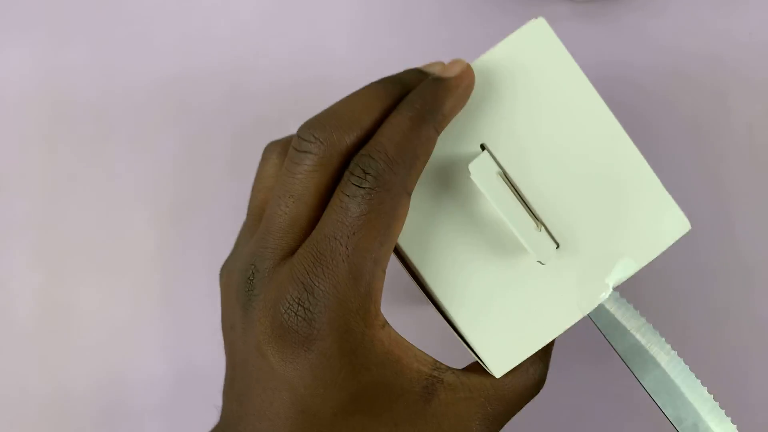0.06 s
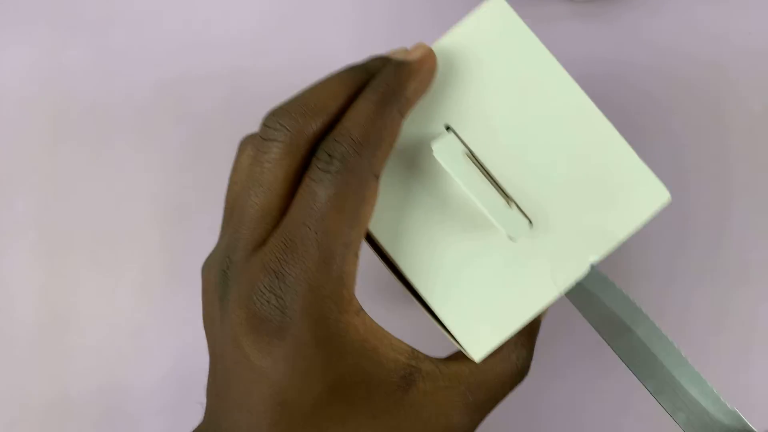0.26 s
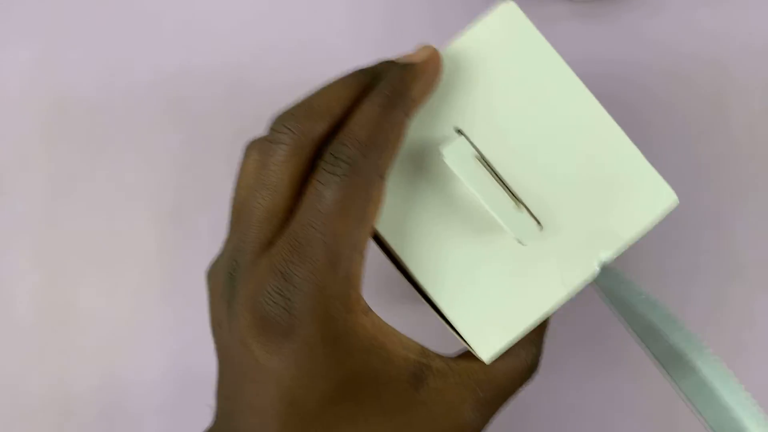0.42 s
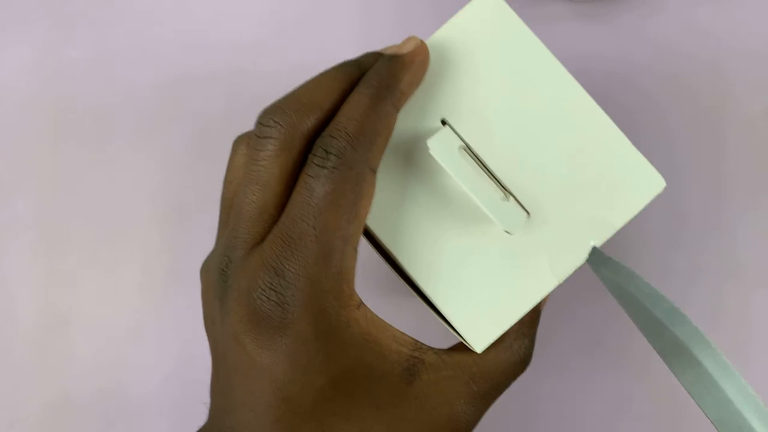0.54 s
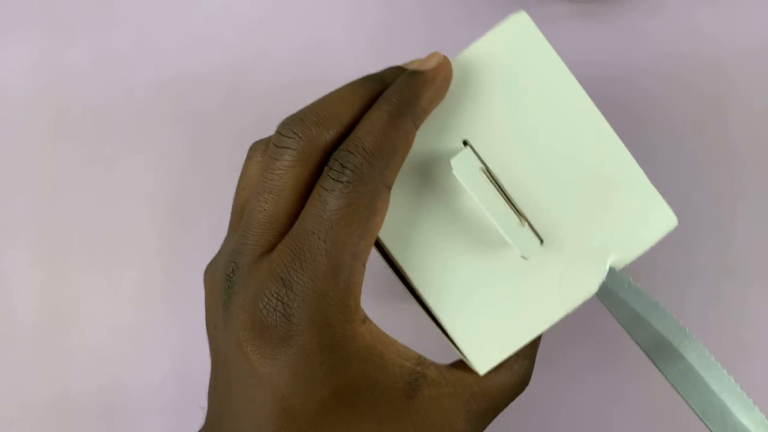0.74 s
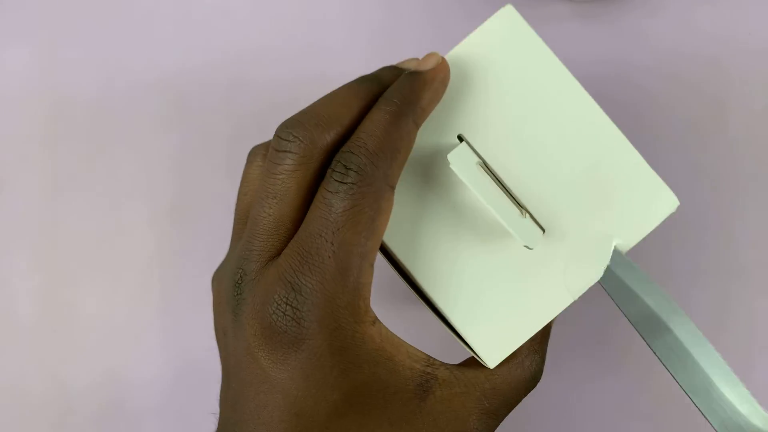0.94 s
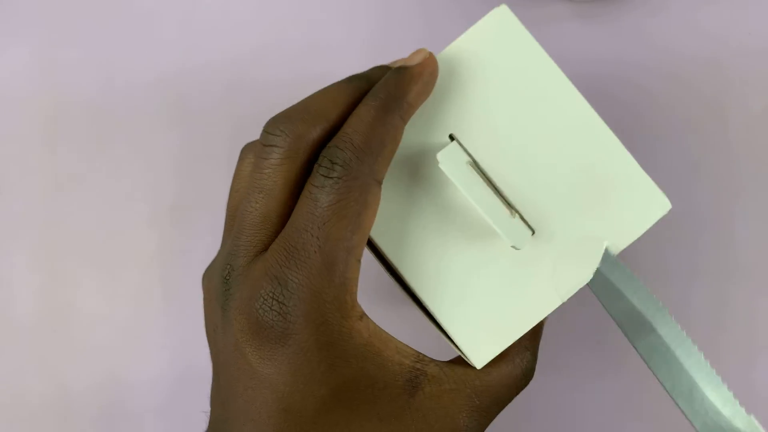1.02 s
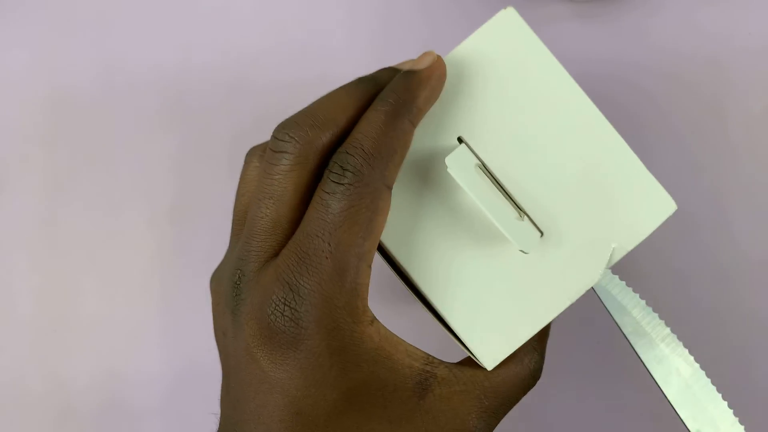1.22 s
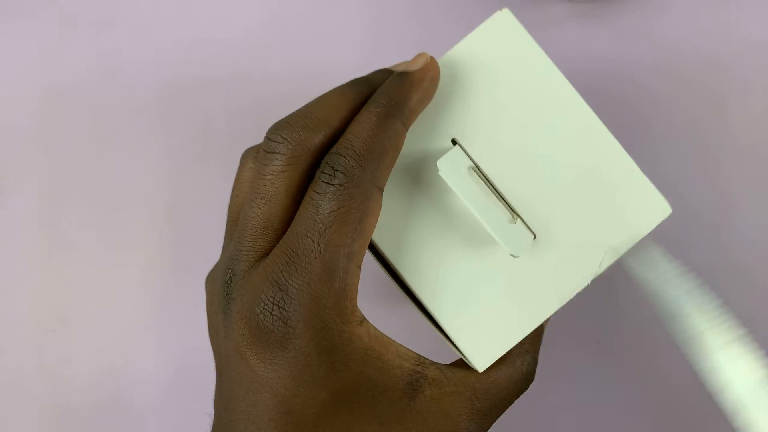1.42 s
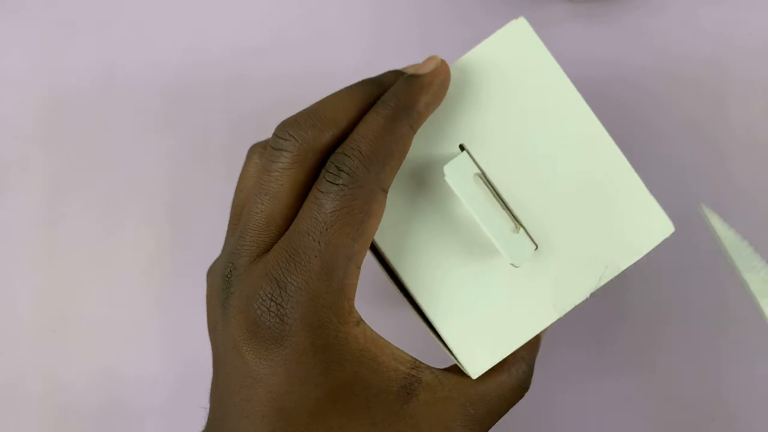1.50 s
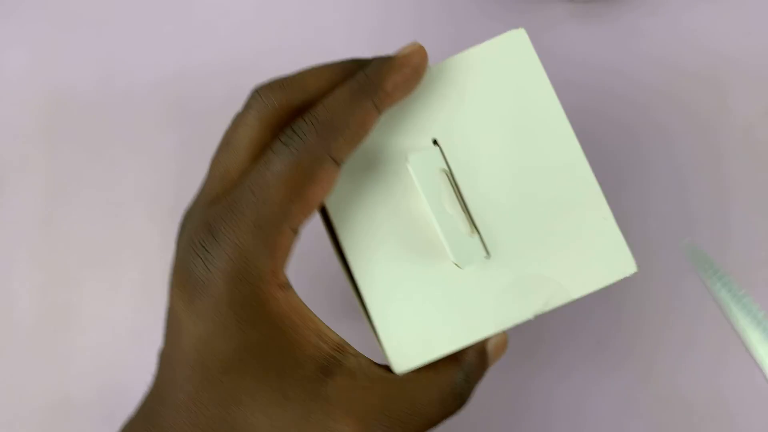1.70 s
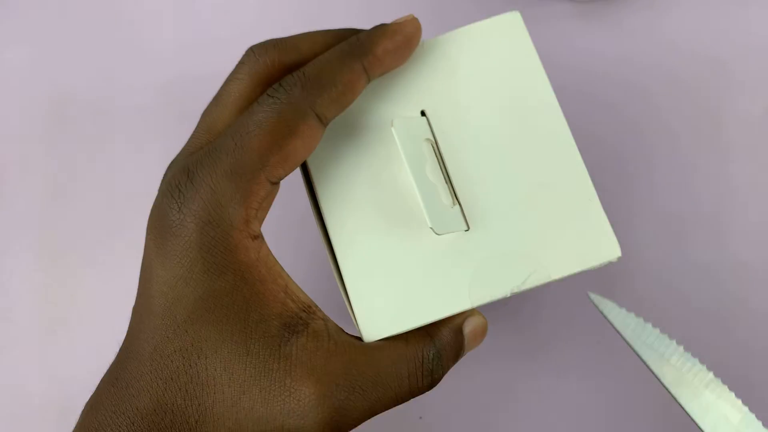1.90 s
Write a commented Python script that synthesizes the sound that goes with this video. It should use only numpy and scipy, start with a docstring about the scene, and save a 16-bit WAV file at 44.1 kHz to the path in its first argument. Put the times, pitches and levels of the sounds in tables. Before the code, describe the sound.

A serrated knife saws at a sticker on a small hollow cardboard box in short uneven scrapes, with papery crackles and boxy thumps, fading into quiet room tone; close microphone in a small room.

```python
"""A serrated knife saws at a sticker on a small hollow cardboard box, held on a table close to a phone.
Its teeth scratch paper fibres: dense random clicks, coloured by paper and blade. Fibres snap in bright noise
bursts, and the blade squeaks in narrow bands of noise. Caught teeth jolt the box, which rings as a set of fading
tones. The shuddering table is two low wavering tones that rise and fall. A room echo follows the knife and box;
behind lie soft room noise, a low hum of narrow noise and faint far whistles of plain tone."""
import sys
import numpy as np
from scipy import signal
from scipy.fft import rfft, irfft
from scipy.io import wavfile
from scipy.ndimage import uniform_filter1d

SR = 44100
rng = np.random.default_rng(int(sys.argv[2]) if len(sys.argv) > 2 else 0)


def magnitude_from_level(level_db):
    """Linear magnitude for a level in decibels (20 dB per decade)."""
    exponent = np.asarray(level_db, float) / 20
    return 10 ** exponent


def store_pcm(level_fs):
    """Save levels as 16-bit WAV."""
    pcm = np.round(np.clip(level_fs, -1, 1) * 32767).astype(np.int16)
    wavfile.write(sys.argv[1], SR, np.atleast_2d(pcm).T)


N = 85995  # length in samples


def unit(x):
    """Scale to an rms (average strength) of 1."""
    return x / np.sqrt(np.mean(x ** 2))


def colour(x, points):
    """Shape the spectrum through (f/Hz, level/dB) points, with a filter that never sounds ahead of its input."""
    points = np.array(points, float)
    hz = np.linspace(1, SR / 2, 2049)
    level_db = np.interp(np.log(hz), np.log(points[:, 0]), points[:, 1])
    # Folding the cepstrum (the spectrum of the log spectrum) makes the filter minimum-phase.
    cepstrum = irfft(level_db * np.log(10) / 20)
    cepstrum[1:2048] *= 2
    cepstrum[2049:] = 0
    response = irfft(np.exp(rfft(cepstrum)))[:2048]
    return signal.fftconvolve(x, response)[:N]


def ring(x, modes):
    """Strike a bank of fading tones (modes) with x; neighbours swing in opposite phase."""
    out = 0
    for k, (hz, db, t60) in enumerate(modes):
        pole = np.exp(2j * np.pi * hz / SR - np.log(1000) / (t60 * SR))
        out = out + (-1) ** k * magnitude_from_level(db) * signal.lfilter([1], [1, -pole], x).imag
    return out


def band(x, hz, width):
    """Keep mostly the sound around one pitch, with a resonant filter."""
    return signal.lfilter(*signal.iirpeak(min(hz, .45 * SR), hz / width, SR), x)


def clicks(rate, spread_db):
    """Random clicks of either sign, rate per second; a random boost makes a few much larger."""
    u, e = rng.random((2, N))
    chance = rate / SR
    sign = np.sign(u - .5 * chance)
    return (u < chance) * sign * magnitude_from_level(-spread_db * np.log(1 - e))


# Tone of the room noise: f/Hz, relative level/dB
ROOM_TONE = [(20, -25), (40, -5.5), (140, -3.5), (333, -11.5), (582, -18.5), (800, -24.5), (1800, -27.5),
             (6000, -36), (15600, -34)]
# Appliance hum: f/Hz, level/dB, width/Hz
HUM_BANDS = [(118.4, -64.5, 12)]
# Far whistle: t/s, length/s, f/Hz, level/dB
WHISTLES = [(1.2, 0.15, 1383, -79), (1.72, 0.065, 1525, -76.5), (1.832, 0.083, 1520, -75)]
ROOM_DB = -63.5


def room():
    """Still air as coloured noise, a wavering hum as narrow noise, and a far whistle as plain tones."""
    t = np.arange(N) / SR
    out = magnitude_from_level(ROOM_DB) * unit(colour(rng.standard_normal(N), ROOM_TONE))
    for hz, db, width in HUM_BANDS:
        out = out + magnitude_from_level(db) * unit(band(rng.standard_normal(N), hz, width))
    for s, length, hz, db in WHISTLES:
        fade = np.clip(np.minimum(t - s, s + length - t) / 0.0072, 0, 1)  # 7.2 ms in and out
        out = out + magnitude_from_level(db) * fade * np.sin(2 * np.pi * hz * t)
    return out


# Rising and falling table shudder: t/s, low mode level/dB, upper mode level/dB
TABLE_LEVELS = [(0.0, -53, -58), (0.092, -64, -59), (0.178, -58, -77), (0.216, -50, -83),
                (0.248, -49.5, -68), (0.286, -75, -53), (0.33, -57.5, -78), (0.456, -53, -48),
                (0.536, -52, -57), (0.574, -67, -52.5), (0.684, -42, -60.5), (0.748, -60, -56.5),
                (0.83, -50, -56), (0.884, -76, -67), (0.938, -52, -73), (0.972, -65, -73), (1.02, -44, -52),
                (1.064, -53, -53.5), (1.124, -60, -56), (1.204, -53, -83), (1.356, -66, -63.5),
                (1.476, -57, -74), (1.52, -67, -84), (1.558, -56.5, -78), (1.618, -62, -76),
                (1.672, -58.5, -74), (1.748, -65, -87), (1.786, -68.5, -72), (1.884, -62.5, -75),
                (1.95, -65, -65)]
# Pitches of the low and upper table modes: f/Hz
TABLE_HZ = (51.44, 89.4)
TABLE_WAVER_HZ = 3.6  # rms drift in pitch


def table():
    """The table sways in two low modes, each a sine that drifts slightly in pitch."""
    rows, t, out = np.array(TABLE_LEVELS), np.arange(N) / SR, 0
    for k, hz in enumerate(TABLE_HZ):
        waver = unit(uniform_filter1d(uniform_filter1d(rng.standard_normal(N), 3000), 3000))
        phase = 2 * np.pi * np.cumsum(hz + TABLE_WAVER_HZ * waver) / SR
        level = magnitude_from_level(np.interp(t, rows[:, 0], rows[:, k + 1]))
        out = out + level * np.sqrt(2) * np.sin(phase)  # root 2: a sine's peak over its rms
    return out


ECHO_DB, ECHO_HZ = -12, 1410  # echo level; where its duller part starts to lose treble
ECHO_BUILD_S, ECHO_T60_S, BRIGHT_T60_S = .018, 0.28, 0.26  # rise, then time to fall 60 dB


def wall_echo(near):
    """Walls return the sound as a noise-like tail that builds up, fades and grows duller."""
    t = np.arange(SR // 2) / SR
    bright = rng.standard_normal(len(t))
    dull = signal.lfilter(*signal.butter(1, ECHO_HZ, fs=SR), bright)
    fading = dull * magnitude_from_level(-60 * t / ECHO_T60_S) + .5 * bright * magnitude_from_level(-60 * t / BRIGHT_T60_S)
    tail = np.clip(t / ECHO_BUILD_S, 0, 1) * fading
    return magnitude_from_level(ECHO_DB) * signal.fftconvolve(near, tail / np.sqrt(np.sum(tail ** 2)))[:N]


# Blade strokes: t/s, scratch level/dB, box rumble level/dB (relative to scratch, before RUMBLE_DB),
# top treble level/dB (relative to scratch)
STROKE_LEVELS = [
    [(0.0, -62.5, 7, 1), (0.02, -58, 17, -6.5), (0.038, -65, -10, -3.5), (0.112, -65, 12, -1),
     (0.13, -70, -11, -3), (0.142, -70.5, 4, -4), (0.17, -77, -1, -14)],
    [(0.17, -75, 28, -7), (0.188, -66, 18, -3), (0.208, -51, 15.5, -5), (0.22, -70.5, 24.5, -2),
     (0.294, -73.5, -12, -3), (0.32, -70.5, -15, -15), (0.334, -70.5, 23, -13), (0.38, -60, 17, -3),
     (0.41, -72, -16, -5)],
    [(0.41, -78, 7, -10), (0.432, -43.5, 25, -3.5), (0.458, -46, 11.5, -7), (0.464, -40, 20, -3.5),
     (0.508, -50.5, 14.5, -8), (0.532, -59.5, 1, 0), (0.568, -64.5, 24, -3), (0.58, -72, -3, 4)],
    [(0.58, -62.5, -4, -6), (0.624, -49.5, 8.5, -9), (0.648, -46.5, 7, -6), (0.68, -50.5, 11, -28),
     (0.688, -57.5, 0, 8.5), (0.704, -52, 22.5, -23), (0.726, -60, -13, -7), (0.786, -59.5, -9, -5),
     (0.88, -76, -7, -6)],
    [(0.88, -72, -4, -11), (0.89, -75, 20, -10), (0.912, -70, -4, -9), (0.952, -63.5, 23, -5),
     (0.968, -60, -10, -5), (0.982, -62, -8, -3), (0.994, -46, 11.5, -2), (1.062, -68, 8, 1),
     (1.075, -69, -6, -5)],
    [(1.075, -57.5, -5, -10), (1.087, -64, 7, -10), (1.097, -61, 22, 3), (1.127, -58.5, -4, -1.5),
     (1.131, -58.5, 15, 1.5), (1.193, -62, 16.5, -1.5), (1.253, -81, -16, -11), (1.297, -71.5, 2, -7),
     (1.36, -86, 21, 6)],
    [(1.36, -84, 26, -8), (1.402, -58.5, 7, -5), (1.464, -60, 15.5, 0), (1.49, -48, 3, -4),
     (1.598, -78.5, 9, -1), (1.664, -66.5, -18, -2), (1.702, -93, 33, 17), (1.732, -75, -7, -26),
     (1.95, -90, 8, 0)],
]


def stroke(col):
    """Glide along one column of the strokes, giving a value for every sample."""
    rows = np.vstack(STROKE_LEVELS)
    return np.interp(np.arange(N) / SR, rows[:, 0], rows[:, col])


# A tooth catches and jolts the box: t/s, push level/dB, f/Hz, length/cycles
BOX_JOLTS = [(.0095, -44.5, 257, 2.9), (0.0152, -42, 262, 1.9), (0.206, -33.5, 267, 2.04),
             (0.218, -45, 220, 2.3), (0.4308, -23.5, 452.6, 3.9), (0.437, -36, 260, 2.9),
             (0.454, -34.5, 300, 2.26), (0.459, -32, 396, 7.9), (0.472, -30, 474, 4.05),
             (.477, -38, 440, 1.5), (0.489, -22, 448, 2.9), (.499, -26.5, 424, 2.8), (.505, -31, 300, 3),
             (0.511, -32, 403, 3.2), (0.641, -23.5, 342, 2.69), (0.651, -27, 368, 5.3),
             (0.659, -30.5, 350, 2.3), (0.67, -32, 358, 2), (0.678, -34, 398, 3.6),
             (0.686, -27.5, 332, 1.48), (0.696, -49, 410, 4.3), (0.706, -41, 332, 3),
             (.766, -45.5, 323, 4.2), (0.9949, -27, 300, 2.5), (1.007, -41, 300, 2.1),
             (1.015, -41.5, 277, 3.66), (1.404, -45.5, 255, 3.3), (1.475, -40, 350, 2.64),
             (1.481, -37, 396, 2.5), (1.518, -36, 350, 3), (1.526, -41, 482, 3.4)]
# Ringing tones of the hollow box: f/Hz, relative level/dB, time to fall 60 dB/s
BOX_MODES = [(171, -19.5, 0.1), (200.5, -9.5, 0.027), (249.6, 8.5, 0.025), (300, -26.5, 0.02),
             (350, 9, 0.041), (413, 3.5, 0.044), (498.8, 3, 0.061), (583, -25.5, 0.048), (636, -32, 0.02),
             (713, -1, 0.033), (777.5, -6, 0.079)]
BOX_RING_DB = -11  # ring relative to the jolts
RUMBLE_PER_S, RUMBLE_DB = 1700, -14  # small pushes per second; trim of their level


def box():
    """Each catch flexes the wall for a few cycles; that and a rumble of small pushes ring the box."""
    flex = np.zeros(N + 2000)
    for s, db, hz, cycles in BOX_JOLTS:
        n = np.arange(int(cycles * SR / hz))
        i = int(s * SR)
        flex[i:i + len(n)] += magnitude_from_level(db) * np.hanning(len(n)) * np.sin(2 * np.pi * hz * n / SR)
    flex = flex[:N]
    flex_ring = magnitude_from_level(BOX_RING_DB) * unit(ring(flex, BOX_MODES)) * np.std(flex)
    pushes = clicks(RUMBLE_PER_S, 1.1)
    rumble_level = magnitude_from_level(stroke(col=1) + stroke(col=2) + RUMBLE_DB)
    rumble = pushes * rumble_level / np.std(ring(pushes, BOX_MODES))
    return flex + flex_ring + ring(rumble, BOX_MODES)


# The blade squeaks on one narrow pitch: t/s, length/s, f/Hz, level/dB (before the swell)
BLADE_SQUEAKS = [(0.431, 0.019, 2000, -51.5), (0.46, .011, 3650, -46.5), (.462, 0.041, 7270, -53),
                 (0.486, .007, 2920, -48), (0.637, 0.015, 5300, -54.5), (0.68, .042, 3550, -52),
                 (0.699, 0.016, 5320, -55), (0.99, 0.01, 7800, -50), (1.178, .015, 1900, -64.5)]
SQUEAK_WIDTH = 0.074  # width of each of the two filters, as a share of the pitch


def squeaks():
    """The blade squeaks: noise narrowed to one pitch swells and fades."""
    out = np.zeros(N)
    for (s, length, hz, db), noise in zip(BLADE_SQUEAKS, rng.standard_normal((len(BLADE_SQUEAKS), 4096))):
        i, n = int(s * SR), int(length * SR)
        width = SQUEAK_WIDTH * hz
        tone = unit(band(band(noise, hz, width), hz, width))
        out[i:i + n] += magnitude_from_level(db) * tone[-n:] * np.hanning(n) ** .5
    return out


# Fibres snap under a tooth: t/s, level/dB (before SNAG_DB and the fade), centre f/Hz,
# filter width (share of centre), hiss level/dB (relative to the pitched part)
FIBRE_SNAGS = [(0.2042, -47, 2570, 0.22, -4), (0.4404, -35, 1940, 0.23, -16), (0.4615, -40, 3420, 0.19, -4),
               (0.4802, -29, 1650, 0.68, -14), (0.4891, -31.5, 1640, 0.39, -0.5),
               (0.4994, -33, 2700, 0.25, -1), (0.597, -43.5, 4630, 0.21, -1), (0.612, -40.5, 2160, 0.25, 3),
               (0.639, -24, 2270, 0.1, -7.5), (0.6474, -41, 1830, 0.51, 7), (0.6594, -26.5, 1820, 0.63, -8),
               (0.6631, -28, 2210, 0.15, 1), (0.6755, -29.5, 2250, 0.44, -1.5),
               (0.6807, -33.5, 3640, 0.16, 0), (0.6984, -35, 3320, 0.21, 1), (0.7034, -38, 3500, 0.23, 5.5),
               (0.7122, -46, 3620, 0.29, 8), (0.9683, -47, 3460, 0.21, -1),
               (0.9933, -25.5, 3780, 0.29, 0.5), (1.0122, -25.5, 3800, 0.48, -1.5),
               (1.0948, -38.5, 4560, 0.28, 1.5), (1.1337, -39.5, 3270, 0.19, 3),
               (1.1538, -42, 2000, 0.3, -4), (1.4046, -44.5, 1740, 0.4, 6), (1.4497, -37, 1900, 0.48, -6),
               (1.4831, -26.5, 1610, 0.15, -7.5), (1.5214, -37, 2080, 0.75, 1.5)]
SNAG_T60_S, SNAG_DB = 0.017, -7.5  # time to fall 60 dB; trim of all the snags


def snags():
    """Snapping fibres give short crackles: noise around a pitch plus a wide hiss, quickly fading."""
    out, n = np.zeros(N + 4096), np.arange(4096)
    envelope = (1 - np.exp(-n / 60.)) * magnitude_from_level(-60 * n / SR / SNAG_T60_S)
    noises = rng.standard_normal((len(FIBRE_SNAGS), 2, 4096))
    for (s, db, hz, width, hiss_db), noise in zip(FIBRE_SNAGS, noises):
        i, width_hz = int(s * SR), np.clip(width, .04, 2) * hz
        pitched = unit(band(band(noise[0], hz, width_hz), hz, width_hz))
        hiss = unit(band(noise[1], 5400.0, 15500.0))
        out[i:i + 4096] += magnitude_from_level(db + SNAG_DB) * (pitched + magnitude_from_level(hiss_db) * hiss) * envelope
    return out[:N]


# Tone of the scratched paper: f/Hz, relative level/dB
PAPER_TONE = [(350, -13.5), (600, -7), (832, -2), (993, -3.5), (1520, -8), (2070, -6), (6170, -15),
              (7470, -16.5), (15600, -29)]
# Ringing tones of blade and paper flap: f/Hz, relative level/dB, time to fall 60 dB/s
BLADE_MODES = [(1136, -2, 0.028), (1263, 11.5, 0.1), (2000, 12, 0.011), (2590, -49.5, 0.09),
               (3550, 13.5, 0.038), (4440, -78, 0.034), (5300, 20, 0.0033), (6930, -63, 0.024),
               (10230, -2, 0.0035)]
BLADE_DB = -12  # blade ring relative to paper
CLICKS_PER_S, CLICK_SPREAD_DB = 16000, 2  # fibre clicks; scale of a click's random boost
CHATTER_DB, CHATTER_HZ = 2, 220  # size of the random level steps, and how often they come
PLAIN_TOP_DB = -9  # treble share of the unshaped scratch


def scratch():
    """Teeth break fibres in dense clicks of chattering level, which sound through paper and blade."""
    k = int(SR / CHATTER_HZ)
    steps = np.repeat(rng.standard_normal(N // k + 1), k)
    chatter = uniform_filter1d(steps, k // 2)[:N]
    fibres = clicks(CLICKS_PER_S, CLICK_SPREAD_DB) * magnitude_from_level(CHATTER_DB * chatter)
    paper = unit(colour(fibres, PAPER_TONE))
    blade = unit(ring(fibres, BLADE_MODES))
    body = unit(paper + magnitude_from_level(BLADE_DB) * blade)
    top = signal.sosfilt(signal.butter(2, 7000, "high", fs=SR, output="sos"), body)
    top_change = magnitude_from_level(stroke(col=3) - PLAIN_TOP_DB) - 1  # added to or taken from the treble already there
    return magnitude_from_level(stroke(col=1)) * (body + top * top_change)


def scene():
    """Mix the knife and box with their echo, the table and the room."""
    near = scratch() + snags() + squeaks() + box()
    return (near + wall_echo(near) + table() + room())[None]


def top_cut(x):
    """Nothing passes above the cut-off."""
    return signal.sosfilt(signal.butter(12, 15740, fs=SR, output="sos"), x)


MIC_LOW_HZ, TOP_HZ = 32, 15450  # lower and upper limits of the sound


def record(dry):
    """The microphone loses the lowest bass, and a steep filter cuts the top."""
    x = signal.sosfilt(signal.butter(3, MIC_LOW_HZ, "high", fs=SR, output="sos"), dry)
    x = signal.sosfilt(signal.ellip(8, .2, 60, TOP_HZ, fs=SR, output="sos"), x)
    return top_cut(x)


dry = scene()
out = record(dry)
store_pcm(out)
```